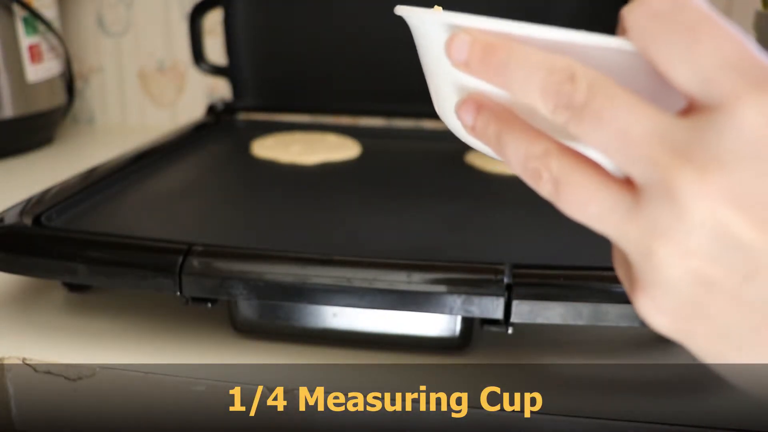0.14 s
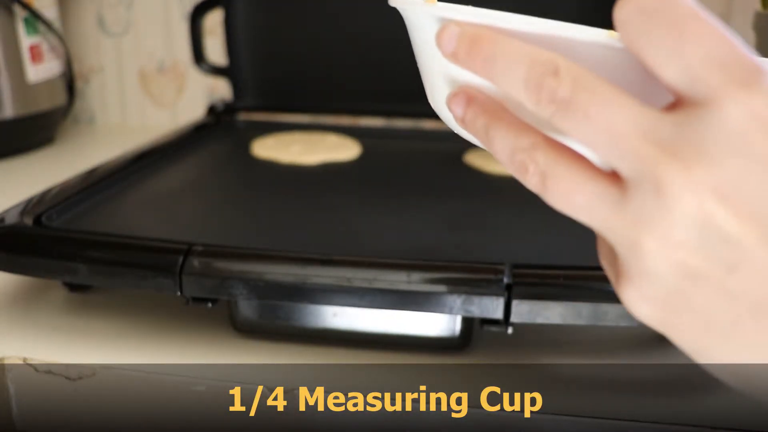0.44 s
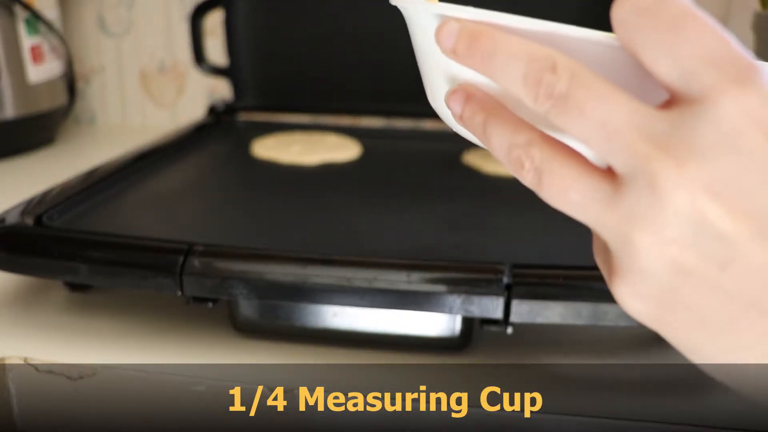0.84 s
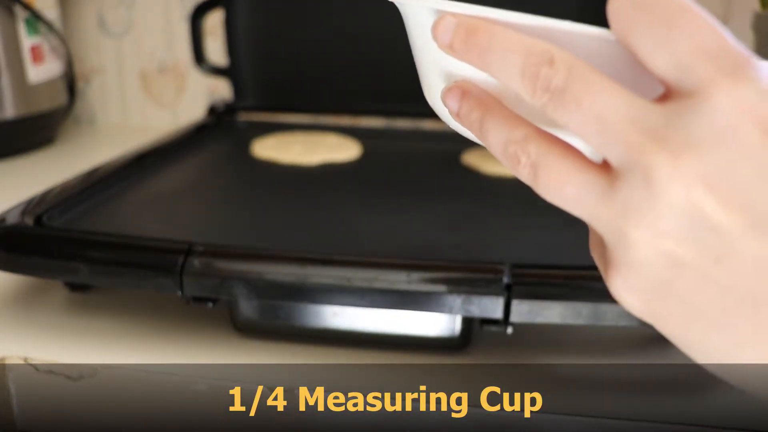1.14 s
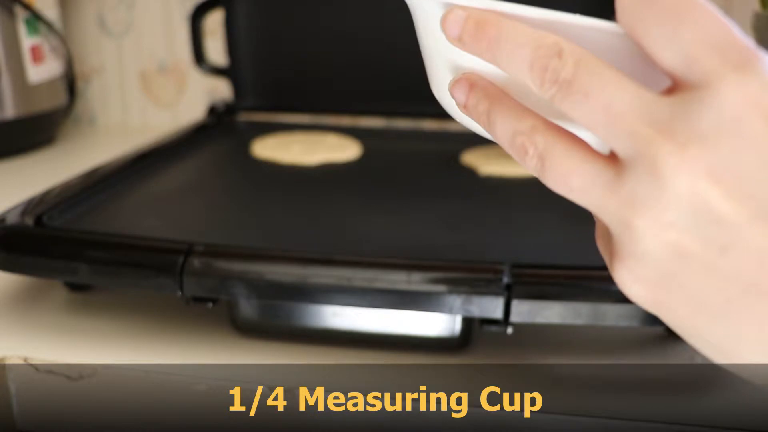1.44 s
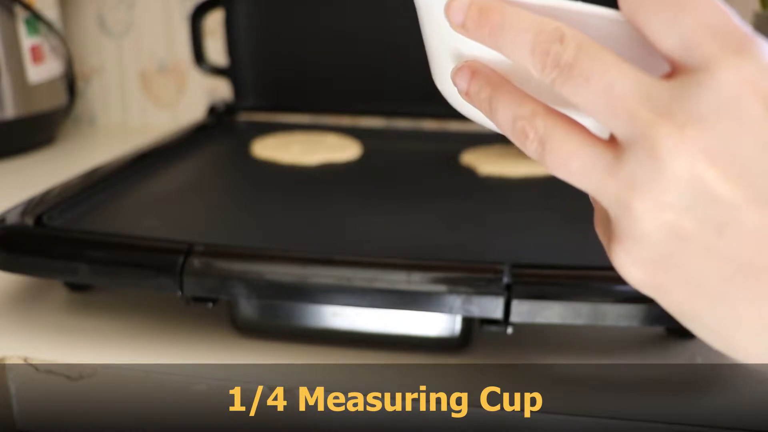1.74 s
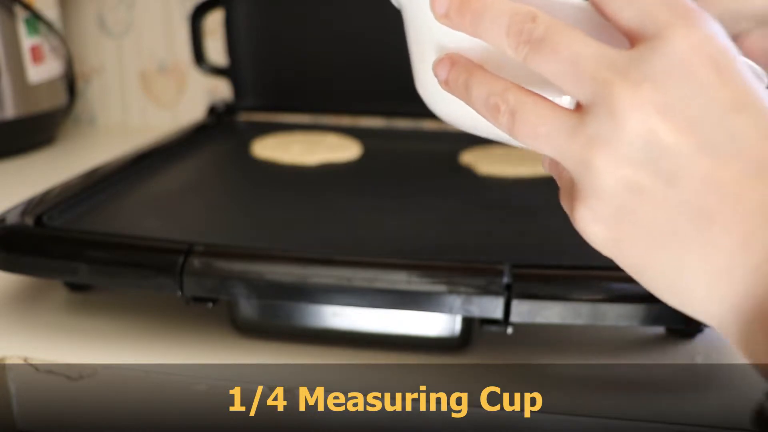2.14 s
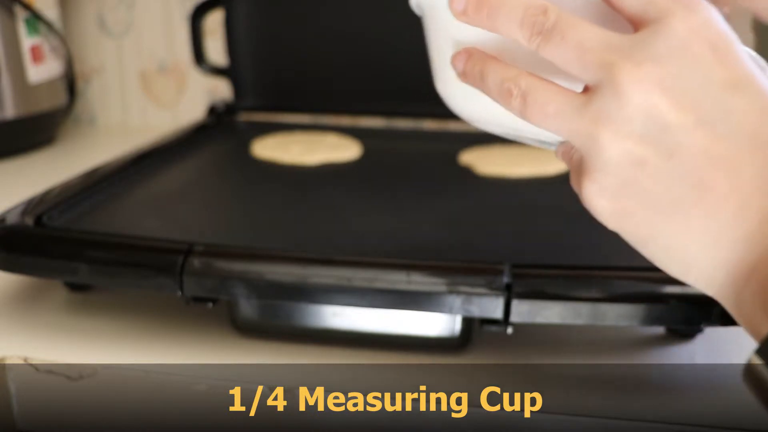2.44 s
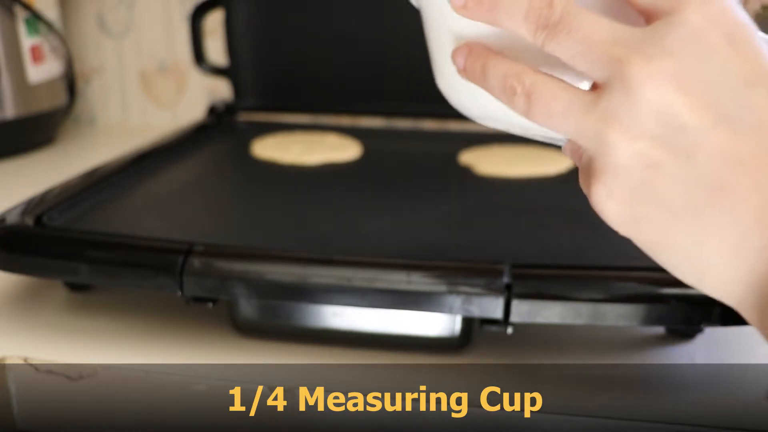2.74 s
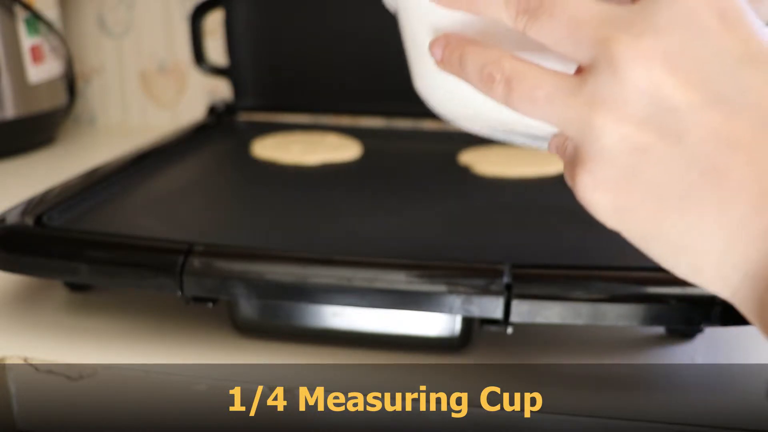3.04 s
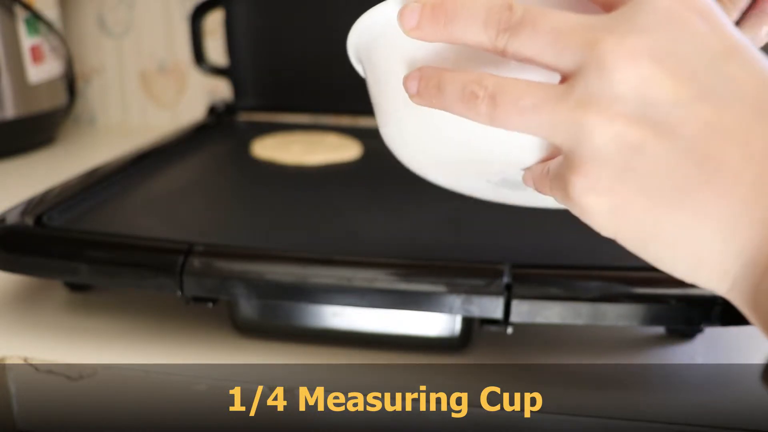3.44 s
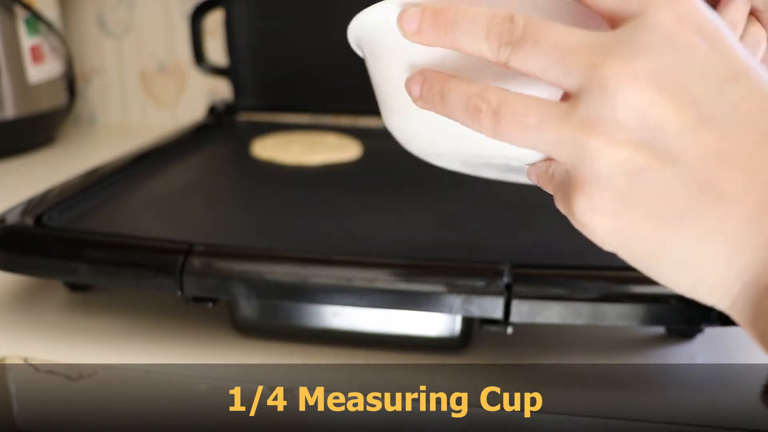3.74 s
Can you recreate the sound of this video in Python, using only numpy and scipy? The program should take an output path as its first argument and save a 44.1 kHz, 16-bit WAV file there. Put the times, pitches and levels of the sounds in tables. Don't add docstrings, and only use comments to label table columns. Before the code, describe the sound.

Batter sizzles quietly on a hot griddle, then two sharp cup taps and brief scraping.

```python
import sys
import numpy as np
from scipy import signal
from scipy.fft import rfft, irfft
from scipy.io import wavfile
from scipy.ndimage import uniform_filter1d

SR = 44100
rng = np.random.default_rng(int(sys.argv[2]) if len(sys.argv) > 2 else 0)


def put_to_file(sound):
    columns = np.atleast_2d(sound).T
    safe = np.clip(columns, -1, 1)
    whole_steps = np.round(safe * 32767)
    wavfile.write(sys.argv[1], SR, whole_steps.astype(np.int16))


def gain_from_db(level_db):
    decades = np.asarray(level_db, float) / 20
    return 10 ** decades


N = 171990


def level(x, db):
    return x * gain_from_db(db) / np.sqrt(np.mean(x ** 2))


def unit_start(x):
    return x / np.sqrt(np.mean(x[:SR // 10] ** 2))


def noise():
    return rng.standard_normal(N)


def colour(x, tone):
    tone = np.array(tone, float)
    hz = np.maximum(np.fft.rfftfreq(8192, 1 / SR), 1)
    log_gain = np.interp(np.log(hz), np.log(tone[:, 0]), tone[:, 1]) * np.log(10) / 20
    cepstrum = irfft(log_gain)
    cepstrum[1:4096] *= 2
    cepstrum[4097:] = 0
    impulse = irfft(np.exp(rfft(cepstrum)))
    return signal.fftconvolve(x, impulse)[:len(x)]


def band(x, hz, width):
    b, a = signal.iirpeak(min(hz, 0.45 * SR), 1 / width, fs=SR)
    return signal.lfilter(b, a, x)


def walk(rate):
    k = int(SR / rate)
    drift = uniform_filter1d(uniform_filter1d(noise(), k), k)
    drift = drift - uniform_filter1d(drift, 6 * k)
    return drift / drift.std()


def clicks(per_s, spread_db):
    hit = rng.random(N) < per_s / SR
    size = rng.exponential(size=N)
    sign = rng.choice([-1, 1], N)
    return hit * sign * gain_from_db(spread_db * np.minimum(size, 3.5))


def add(out, s, x):
    i = int(s * SR)
    out[i:i + len(x)] += x[:len(out) - i]


# (frequency [Hz], density [dB per Hz])
HISS_TONE = [(880, -18), (1500, -15), (5400, 1), (9200, -3), (16000, 6)]


def mic_hiss():
    return level(colour(noise(), HISS_TONE), -53.5)


# (frequency [Hz], density [dB per Hz])
SIDE_TONE = [(18, -38), (30, -10), (1430, -11.5), (1670, -15.5), (4910, -12), (8980, -14), (16000, -3)]


def port_difference(mid):
    SIDE_DB, SIDE_FOLLOW = -57.5, 0.22
    loud = np.abs(uniform_filter1d(np.gradient(mid) ** 2, size=300))
    swell = (loud / np.median(loud)) ** (SIDE_FOLLOW / 2)
    return level(colour(noise(), SIDE_TONE), SIDE_DB) * swell


# (frequency [Hz], density [dB per Hz])
RUMBLE_TONE = [(12, -69), (20, -6.5), (60, 1), (86, -6), (200, -12.5), (306, -15), (423, -17.5),
               (1260, -22), (2500, -23), (3250, -30), (5500, -120)]


def rumble():
    return level(colour(noise(), RUMBLE_TONE), -49.5)


def mains_hum():
    HUM_HZ, HUM_WIDTH, HUM_DB = 60, 0.14, -56
    once = band(noise(), HUM_HZ, HUM_WIDTH)
    return level(band(once, HUM_HZ, HUM_WIDTH), HUM_DB)


# (time [s], length [s], level [dB], centre [Hz])
BOWL_TILT = (2.2, .3, -66, 410)


def tilted_bowl():
    s, length, db, hz = BOWL_TILT
    from_middle = np.arange(N) / SR - s - length / 2
    swell = np.exp(-(from_middle / (length / 2)) ** 4)
    return level(band(noise(), hz, 0.036), db) * swell


def room_tail(t60):
    ROOM_BUILD_S = 0.0051
    t = np.arange(SR // 2) / SR
    build = 1 - np.exp(-(t / ROOM_BUILD_S) ** 2)
    return rng.standard_normal(len(t)) * build * gain_from_db(-60 * t / t60)


# (frequency [Hz], density [dB per Hz])
SPIT_TONE = [(1500, -21), (3000, -12.5), (5000, -1), (6800, -5.5), (9300, 3), (12500, 0), (14500, 1),
             (16000, -1)]
SPIT_S = 0.0026
# (time [s], level [dB])
BOIL = [(0, -42), (.45, -43.5), (.85, -42), (1.03, -44.5), (1.1, -46), (1.4, -45), (1.6, -43.5),
        (2.25, -44), (2.4, -49.5), (2.6, -44.5), (2.78, -53.5), (3.08, -55), (3.13, -45), (3.3, -44.5),
        (3.48, -47.5), (3.56, -48.5), (3.7, -48), (3.9, -49)]
# (frequency [Hz], density [dB per Hz])
SIZZLE_TONE = [(700, -56), (1200, -13), (1640, -2.5), (1900, -4.5), (2700, -0.5), (4700, 1), (9200, 2),
               (16000, -1)]


def sizzle():
    BUBBLES_PER_S, BUBBLE_SPREAD_DB, SEETHE_DB = 2500, 5.5, -2
    FLICKER_DB, FLICKER_HZ = 1.23, 41
    SPIT_PER_S, SPIT_SPREAD_DB, SPIT_DB = 110, 4, -3.5

    bubbles = level(clicks(BUBBLES_PER_S, BUBBLE_SPREAD_DB), -2.5)
    fine = bubbles + level(noise(), SEETHE_DB)
    fine = level(colour(fine * gain_from_db(FLICKER_DB * walk(FLICKER_HZ)), SIZZLE_TONE), 0.38)

    tail = np.exp(-np.arange(600) / SR / SPIT_S)
    gate = signal.fftconvolve(np.abs(clicks(SPIT_PER_S, SPIT_SPREAD_DB)), tail)[:N]
    crackle = gate * clicks(7900, 1.5)
    small_spits = level(colour(crackle, SPIT_TONE), SPIT_DB)

    times, boil_db = np.transpose(BOIL)
    return (fine + small_spits) * gain_from_db(np.interp(np.arange(N) / SR, times, boil_db))


# (time [s], peak [dB], centre [Hz])
SPITS = [(0.279, -23, 7650), (0.6816, -26, 8180), (0.9132, -45, 9150), (0.932, -27, 10600),
         (0.9546, -25, 9300), (0.9867, -28, 8220), (1.028, -24, 10900), (1.27, -27, 8870), (1.5, -24, 8400),
         (1.6133, -19.5, 9400), (1.9586, -45, 9080), (2.0042, -36, 9020), (2.0265, -25, 9460),
         (2.056, -23, 8560), (2.173, -21.5, 8760), (2.2894, -21, 5240), (2.5646, -24, 8140),
         (2.5857, -21.5, 9180), (2.613, -17.5, 4760), (2.821, -30, 9000), (2.8832, -29.5, 9090),
         (3.1244, -26, 8200), (3.1432, -25, 9700), (3.1799, -19, 9400), (3.258, -19, 9200),
         (3.389, -23, 9350), (3.432, -24.5, 9750), (3.4666, -19, 8600), (3.6601, -25, 9050),
         (3.8666, -24, 9800)]


def big_spits():
    BIG_SPIT_DB, WIDE_DB = -0.5, 1.5
    out = np.zeros(N)
    tail = np.exp(-np.arange(600) / SR / SPIT_S)
    for s, db, hz in SPITS:
        grain = rng.standard_normal(600)
        burst = grain * np.abs(grain) * tail
        burst = band(burst, hz, 0.12) + gain_from_db(WIDE_DB) * colour(burst, SPIT_TONE)
        add(out, s, burst / np.abs(burst).max() * gain_from_db(db + BIG_SPIT_DB))
    return out


# (time [s], length [s], level [dB], centre [Hz])
SCRAPES = [(3.198, .02, -42.5, 1600), (3.255, 0.015, -42, 1740), (3.272, 0.021, -41.5, 900),
           (3.3, 0.01, -36, 1130), (3.314, 0.026, -49.5, 1080), (3.348, 0.048, -50.5, 980),
           (3.414, 0.017, -43.5, 850), (3.431, 0.011, -45, 1430), (3.434, 0.042, -50, 880),
           (3.48, 0.036, -45.5, 990), (3.493, 0.033, -64, 1880)]


def scrapes():
    SCRAPE_PER_S, SCRAPE_WIDTH, SCRAPE_ROOM_DB = 560, 0.096, -6
    out = np.zeros(N)
    grit = clicks(SCRAPE_PER_S, 3.6) + 0.18 * noise()
    for s, length, db, hz in SCRAPES:
        i = int(s * SR)
        t = np.arange(int((length + 0.03) * SR)) / SR
        fade_in = np.clip(t / 0.002, 0, 1)
        fade_out = np.clip((length - t) / 0.006 + 1, 0, 1)
        rub = grit[i:i + len(t)] * fade_in * fade_out
        overtone = 0.11 * band(rub, 1.54 * hz, 0.12)
        breath = 0.17 * band(rub, hz, 0.57)
        rub = band(rub, hz, SCRAPE_WIDTH) + overtone + breath
        add(out, s, rub * gain_from_db(db) / np.sqrt(np.sum(rub ** 2) / (length * SR)))
    tail = room_tail(0.2)
    tail = tail / np.sqrt(np.sum(tail ** 2))
    return out + gain_from_db(SCRAPE_ROOM_DB) * signal.fftconvolve(out, tail)[:N]


def contact(rebound, way):
    CONTACT_MS, REBOUND_DB = 0.029, -11
    RATTLE_S, RATTLE_DB = 0.0056, -11
    t = np.arange(1200) / SR
    touches = rng.standard_normal(1200) * (rng.random(1200) < 0.05)
    push = gain_from_db(RATTLE_DB) * touches * np.exp(-t / RATTLE_S)
    push[0] = 1
    push[int(rebound * SR)] = way * gain_from_db(REBOUND_DB)
    soft_pulse = t[:100] * np.exp(-t[:100] * 1000 / CONTACT_MS)
    return np.convolve(push, soft_pulse)


def cup_ring(modes, push):
    TAP_LOW_HZ = 110
    t = np.arange(SR // 4) / SR
    body = np.zeros(len(t))
    for k, (hz, db, t60) in enumerate(modes):
        body += (-1) ** k * gain_from_db(db - 60 * t / t60) * np.sin(2 * np.pi * hz * t)
    highpass = signal.butter(2, TAP_LOW_HZ, "high", fs=SR, output="sos")
    return signal.sosfilt(highpass, signal.fftconvolve(body, push))


# (time [s], ring peak [dB], room level [dB], room t60 [s], rebound after [s], rebound direction [gain])
TAPS = [
    (2.6342, 0, -31.5, 0.35, 0.001186, -1.2),
    (2.9888, 4.7, -32.5, 0.39, 0.001615, 0.65),
]
# (frequency [Hz], level [dB], t60 [s])
CUP_MODES = [
    [(164, -19.5, 0.042), (433, -4.5, 0.032), (804, -1, .025), (1080, -7, .04), (1330, -2.5, 0.014),
     (1600, 3, 0.013), (1910, -3.5, 0.013), (2410, -10.5, 0.018), (3340, -9.5, 0.017), (4010, -14.5, .025),
     (4770, -5.5, 0.012), (7130, -5, 0.0057), (11000, -1, .004)],
    [(414, -17.5, 0.044), (670, 1.5, 0.028), (1132, 4, 0.021), (1300, -9.5, 0.019), (1600, -3, 0.0047),
     (1740, 9.5, 0.0072), (2520, -2.5, 0.015), (2920, -6.5, .008), (3570, -3, 0.013), (4780, -13, 0.015),
     (6130, -4, .005), (6990, -2.5, 0.015), (9450, 3, 0.0027), (13000, -1, .003)],
]
# (frequency [Hz], density [dB per Hz])
FIRST_TAP_ROOM = [(130, -26), (390, -3), (1000, -1.5), (1900, -9), (2750, -19.5), (4050, -9), (5400, -19.5),
                  (10400, -31)]
# (frequency [Hz], density [dB per Hz])
SECOND_TAP_ROOM = [(300, -17), (680, 1), (1120, -0.5), (3550, -7.5), (3900, -39), (5000, -14), (5700, -39),
                   (10400, -46)]


def taps():
    RING_IN_ROOM_DB = -3.5
    out = np.zeros(N)
    rooms = (FIRST_TAP_ROOM, SECOND_TAP_ROOM)
    for tap, modes, tone in zip(TAPS, CUP_MODES, rooms):
        s, ring_db, room_db, t60, rebound, way = tap
        ring = cup_ring(modes, contact(rebound, way))
        add(out, s, ring / np.abs(ring).max() * gain_from_db(min(ring_db, 0)))
        diffuse = unit_start(colour(room_tail(t60), tone))
        smeared = unit_start(signal.fftconvolve(room_tail(t60), ring))[:SR // 2]
        wet = diffuse + gain_from_db(RING_IN_ROOM_DB) * smeared
        add(out, s, unit_start(wet) * gain_from_db(room_db))
    return out


def scene():
    background = mic_hiss() + rumble() + mains_hum() + tilted_bowl()
    mid = background + sizzle() + big_spits() + scrapes() + taps()
    side = port_difference(mid)
    return np.array([mid + side, mid - side])


def low_pass(x):
    return signal.sosfilt(signal.butter(12, 16510, fs=SR, output="sos"), x)


# (frequency [Hz], gain [dB])
MIC_TONE = [(20, 0), (10600, 0), (11400, -5), (15850, -6), (16000, -50), (22050, -60)]


def record(dry):
    heard = np.clip([colour(x, MIC_TONE) for x in dry], -1, 1)
    return low_pass(heard)


dry = scene()
out = record(dry)
put_to_file(out)
```